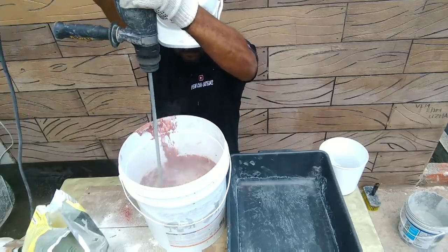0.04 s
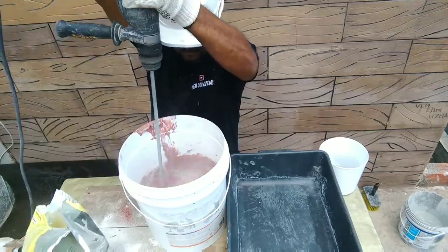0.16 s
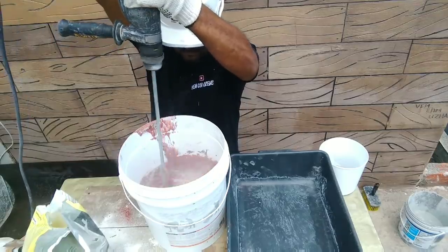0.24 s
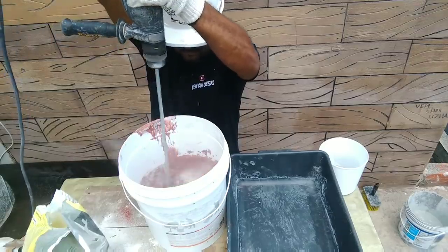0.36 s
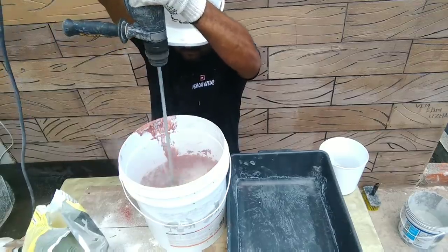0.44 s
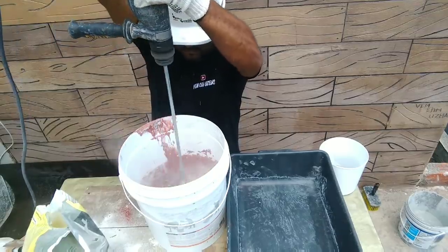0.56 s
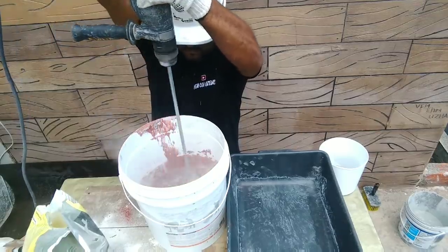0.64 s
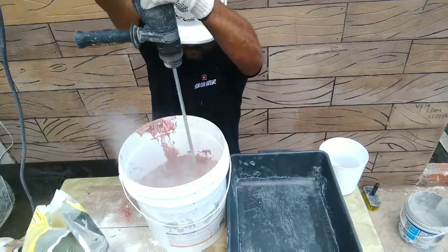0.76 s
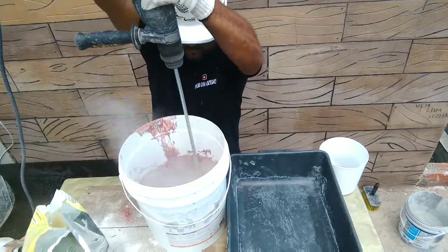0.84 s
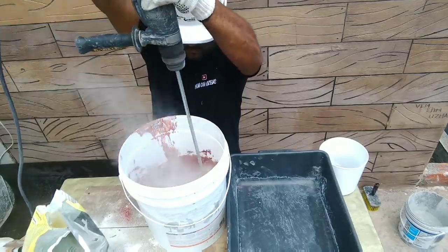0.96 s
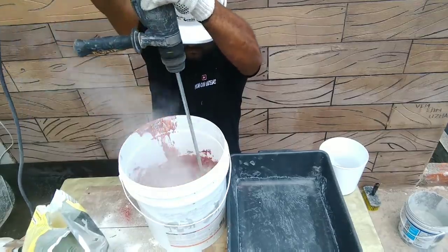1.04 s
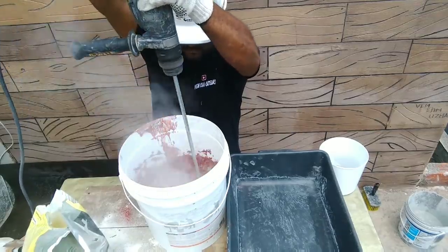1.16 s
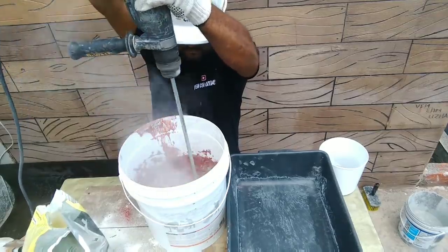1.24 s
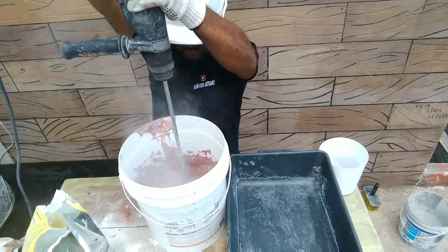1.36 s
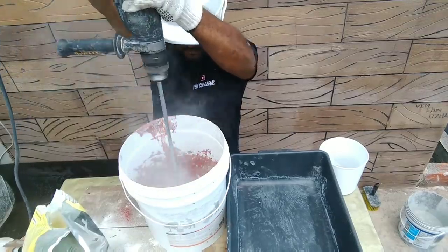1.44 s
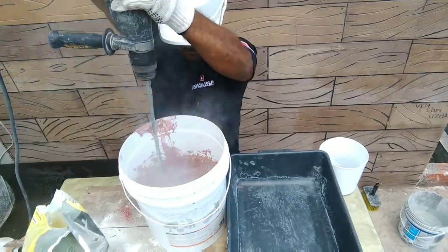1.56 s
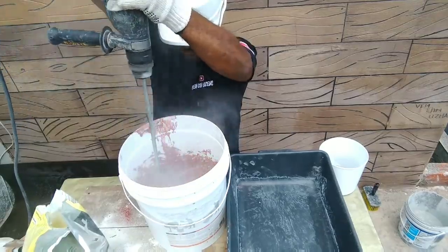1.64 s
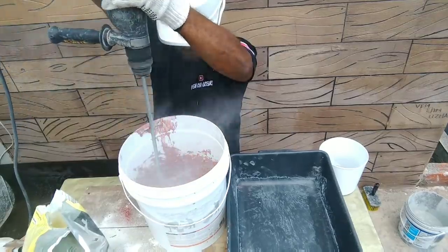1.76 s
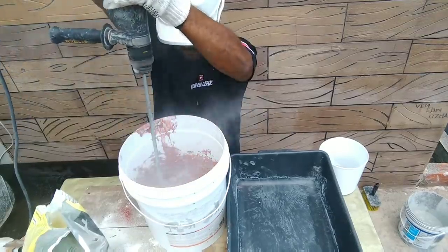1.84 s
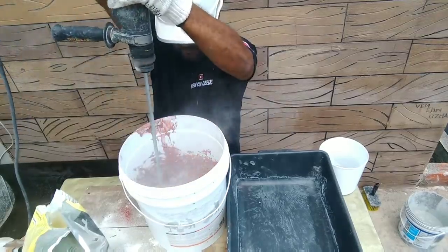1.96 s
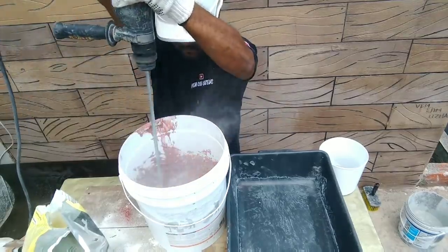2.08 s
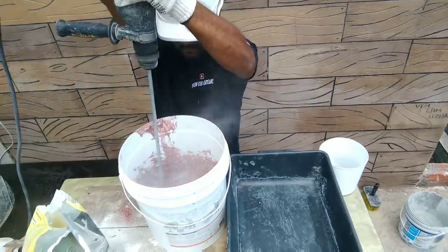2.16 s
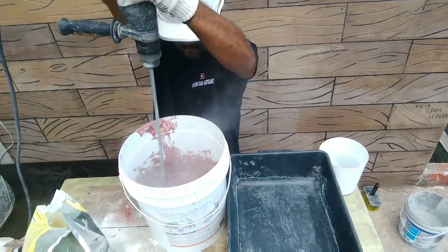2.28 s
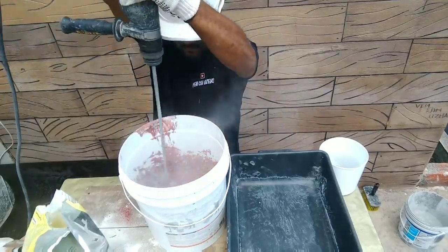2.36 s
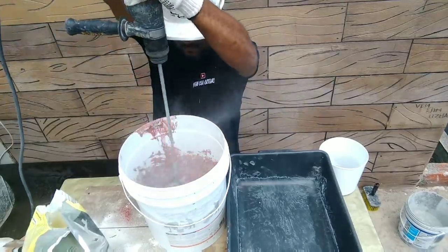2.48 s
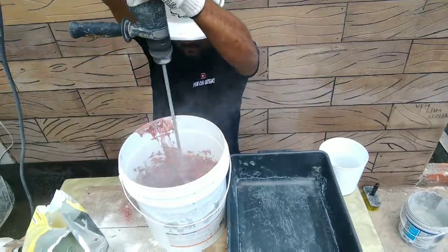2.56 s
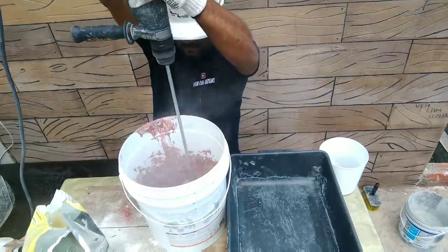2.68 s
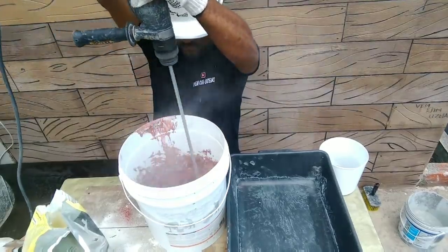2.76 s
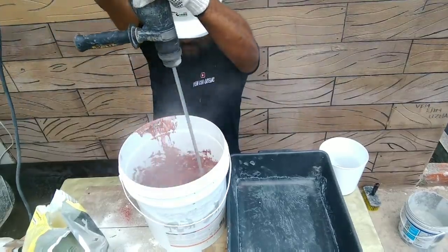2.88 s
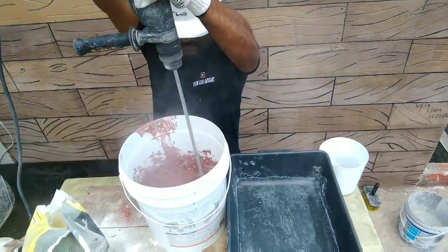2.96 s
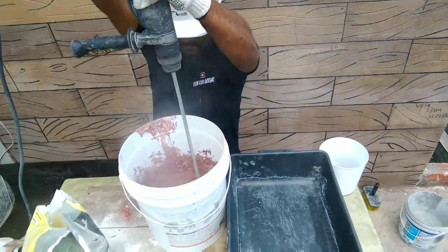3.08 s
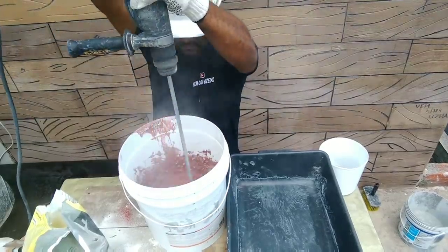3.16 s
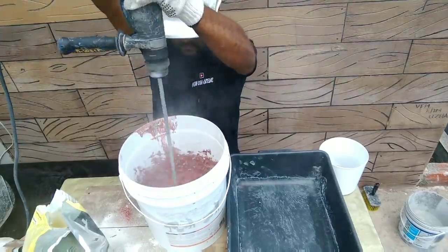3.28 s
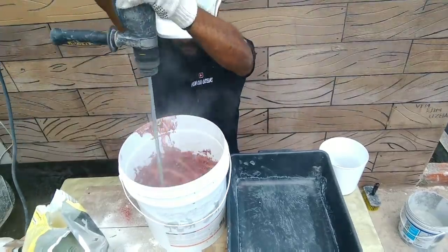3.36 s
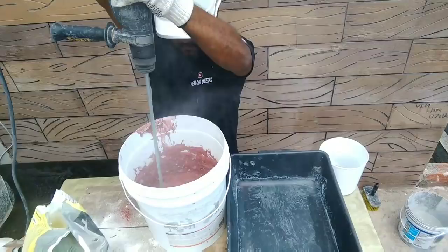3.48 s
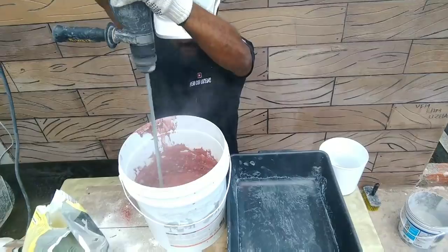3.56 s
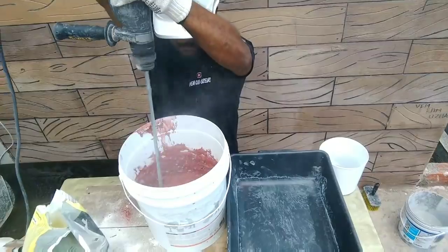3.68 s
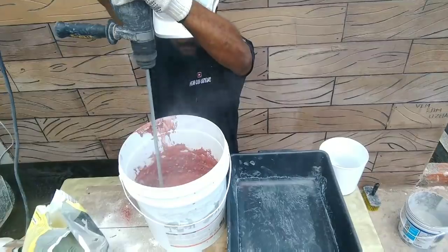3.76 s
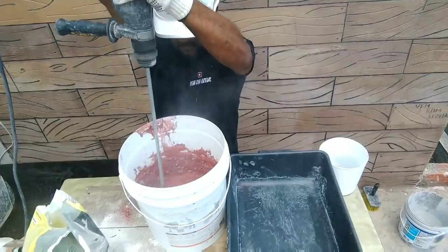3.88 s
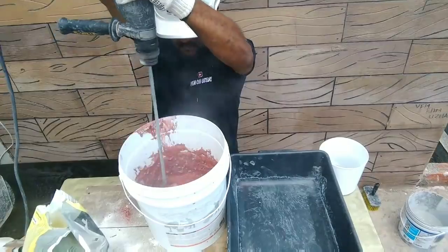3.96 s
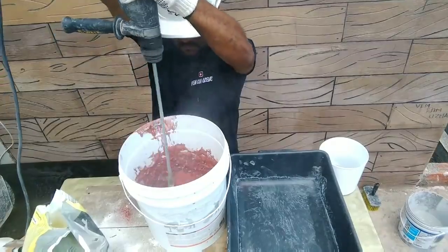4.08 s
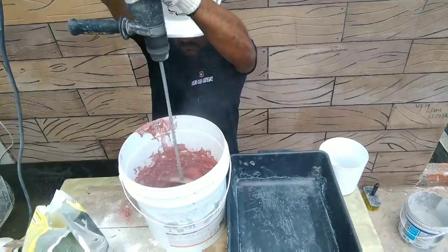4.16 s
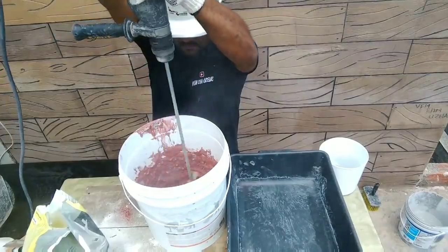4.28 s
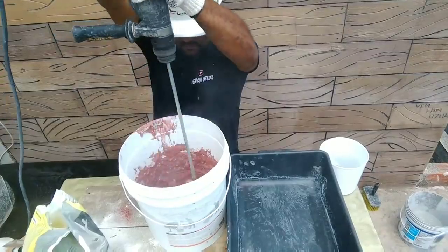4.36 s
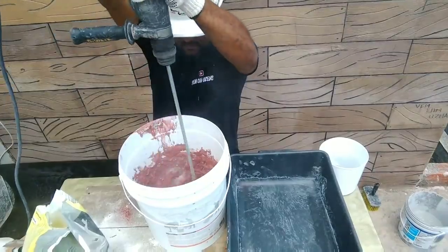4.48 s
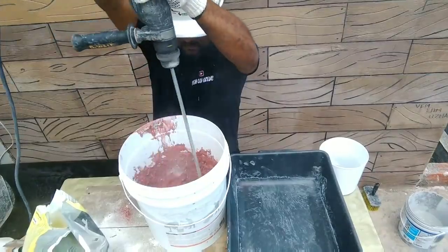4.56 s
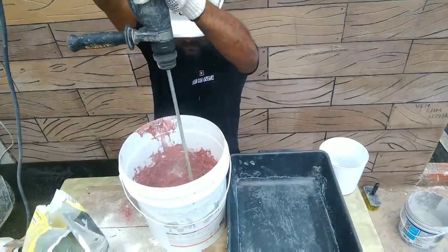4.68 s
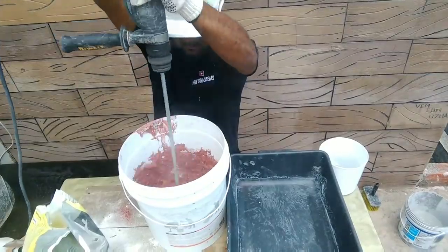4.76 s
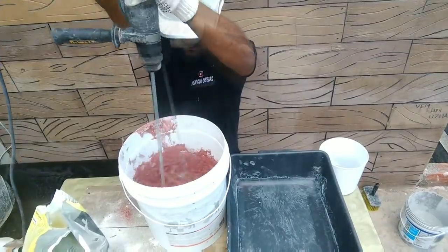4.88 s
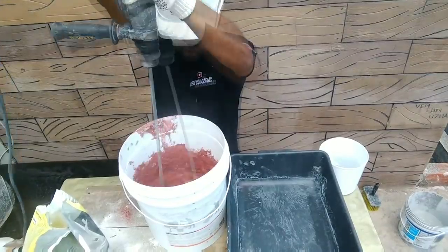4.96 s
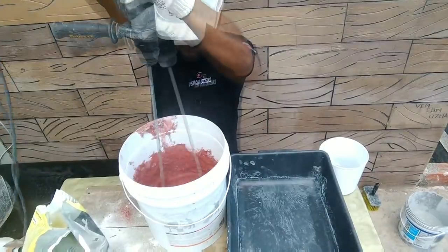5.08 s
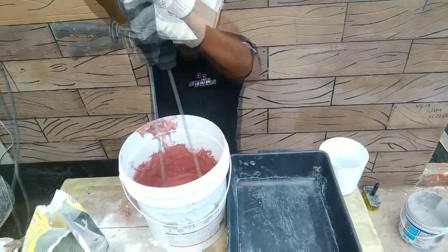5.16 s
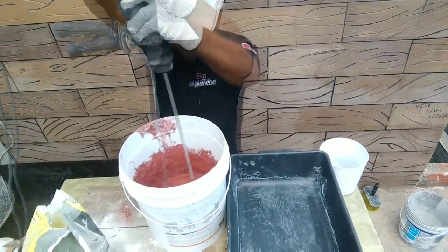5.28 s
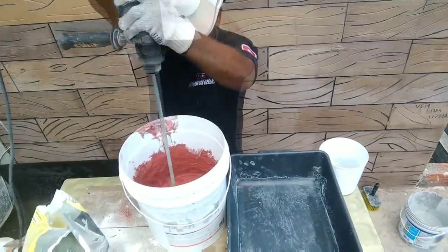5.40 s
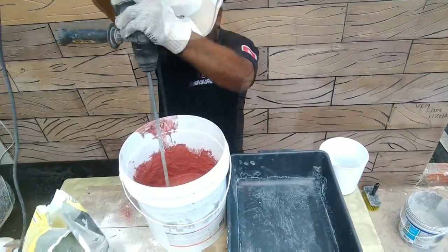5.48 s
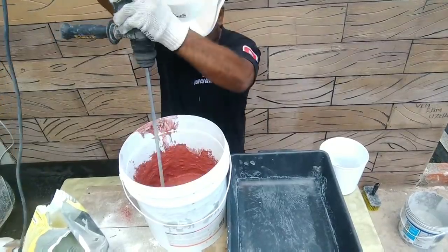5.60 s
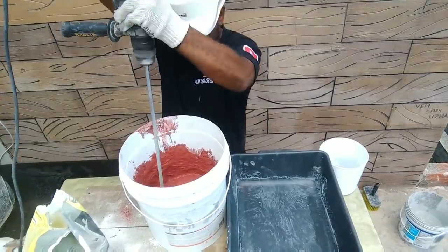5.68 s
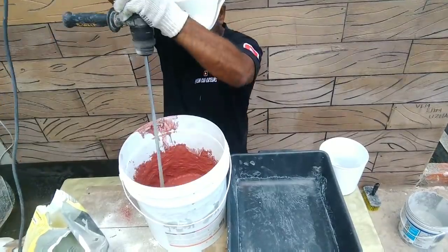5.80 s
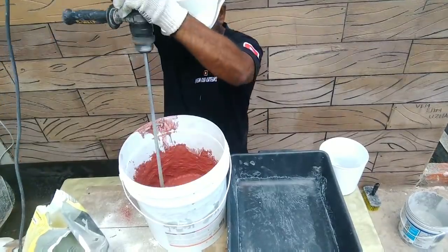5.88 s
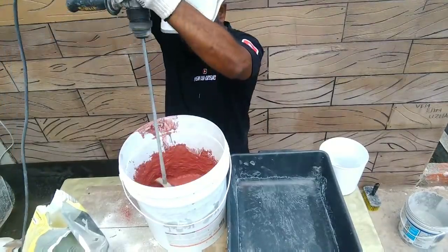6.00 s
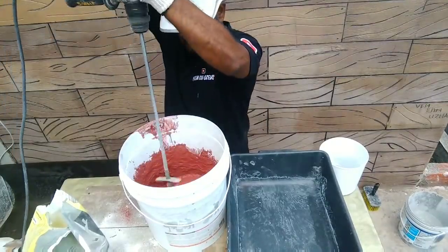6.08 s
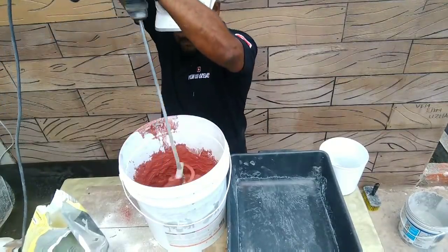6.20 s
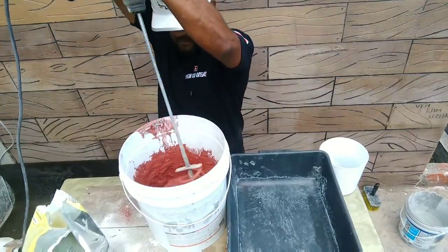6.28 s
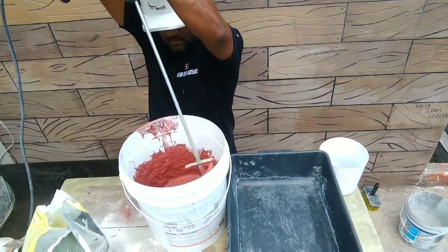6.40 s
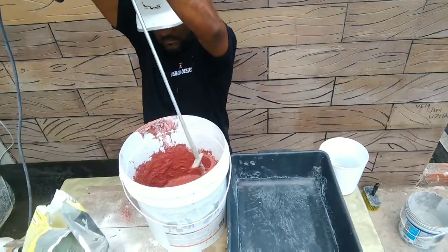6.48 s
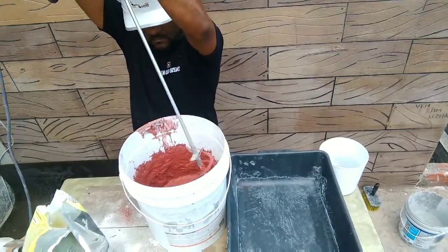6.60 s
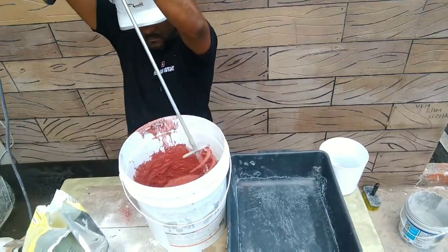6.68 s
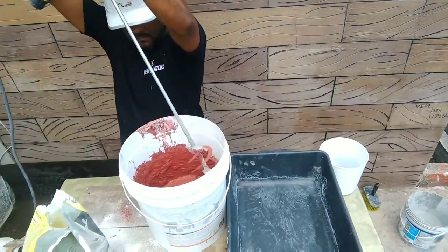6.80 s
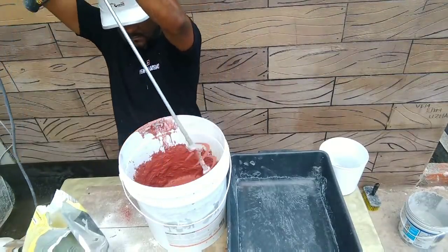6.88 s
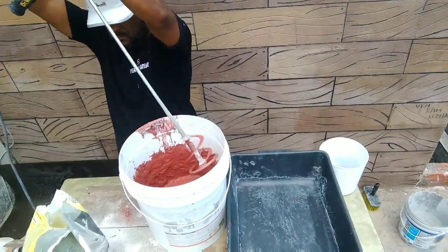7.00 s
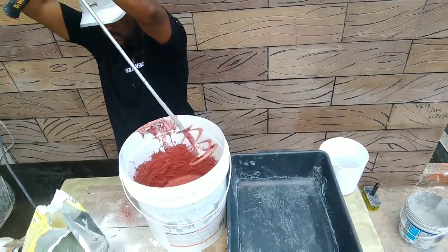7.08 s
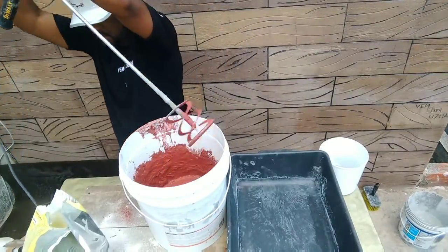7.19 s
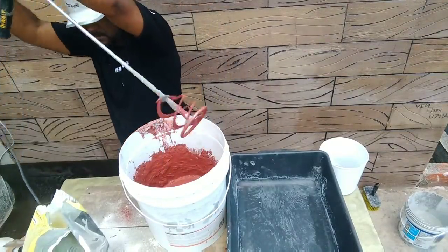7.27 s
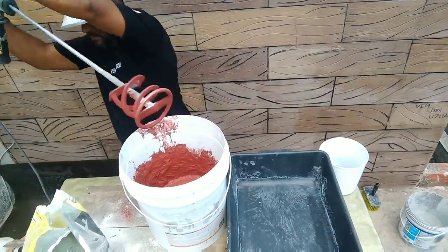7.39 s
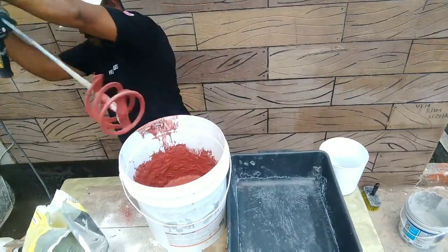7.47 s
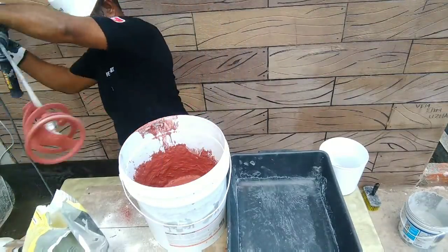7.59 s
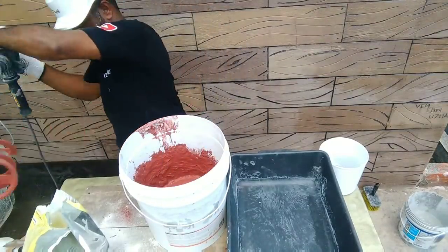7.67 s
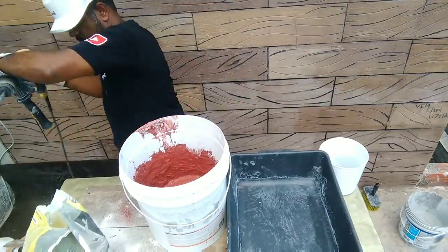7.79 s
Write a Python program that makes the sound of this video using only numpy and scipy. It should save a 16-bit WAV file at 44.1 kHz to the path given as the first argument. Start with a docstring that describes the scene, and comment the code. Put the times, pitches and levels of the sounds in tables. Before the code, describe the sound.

A loud power mixer fills a dry, close stereo pickup at a building site: buzzing hum, gear whine, airy hiss and thin high whistle. Irregular dull thuds and knocks ring the bucket, with small gritty ticks. After a smooth fade to silence it jumps back in, slows as the paddle is lifted, clicks off with a sharp double clack and spins down in a softer descending whine over low bench rumble.

```python
"""An electric drill turns a paddle in a plastic bucket of mortar, close to a pair of microphone ports.
The motor whines on multiples of its shaft speed over the shaped noise of housing, gears, air and brushes.
The paddle scrapes and knocks the ringing bucket, the bench rumbles, and short bright noise bursts stand out.
The sound fades away and comes back at once with the paddle being lifted out; the trigger clacks and
the motor coasts down."""
import sys
import numpy as np
from scipy import signal
from scipy.fft import rfft, irfft, next_fast_len
from scipy.io import wavfile
from scipy.ndimage import uniform_filter1d, map_coordinates

SR = 44100
rng = np.random.default_rng(int(sys.argv[2]) if len(sys.argv) > 2 else 0)


def master_out(mix):
    """Clip the mix to full scale and print it as 16-bit PCM to the path in sys.argv[1]."""
    frames = np.transpose(np.atleast_2d(mix))
    ceiling = np.clip(frames, -1, 1)
    pcm = np.round(ceiling * 32767).astype(np.int16)
    wavfile.write(sys.argv[1], SR, pcm)


N = 345744
GAP_S = 5.752  # the mixing ends and the lifting out begins

# resonances of the bucket wall: (frequency [Hz], width [Hz], level [dB])
WALL_MODES = [(194, 58, -7), (271, 24, 0)]
# resonances of the bucket rim: (frequency [Hz], width [Hz], level [dB])
RIM_MODES = [(502, 12, -6.5), (620, 33, 3), (920, 110, -20)]
# bands where the left port gains a whole cycle on the right, while mixing: (centre [Hz], width [Hz])
CROSS_MIXING = [(2180, 407), (4250, 750), (6500, 730), (8900, 860), (11000, 640), (13000, 800),
                (15300, 960)]


def amp(db):
    """Gain of a level in dB."""
    return 10 ** (np.asarray(db) / 20)


def unit(x):
    """x at rms 1."""
    return x / np.sqrt(np.mean(x ** 2) + 1e-20)


def along(points, hz):
    """Value at hz between (Hz, value) points on a log frequency axis."""
    f, values = np.transpose(points)
    return np.interp(np.log(hz + 1), np.log(f + 1), values)


def curves(*tables):
    """One value per sample for each column after the time."""
    s, *columns = np.transpose(np.concatenate(tables))
    return [np.interp(np.arange(N) / SR, s, column) for column in columns]


def wobble(rate):
    """A smooth random curve, rate knots a second."""
    coarse = np.arange(0, N + 32, 32)
    knots = rng.standard_normal(int(N * rate / SR) + 4)
    return np.interp(np.arange(N), coarse, map_coordinates(knots, [coarse * rate / SR]))


def filtered(x, response):
    """x times a complex response of frequency."""
    m = next_fast_len(N + SR // 2)
    return irfft(rfft(x, m) * response(np.fft.rfftfreq(m, 1 / SR)), m)[..., :N]


def modes(table):
    """Causal response of a few resonances, alternating in sign."""
    def response(f):
        total = 0
        for k, (centre, width, db) in enumerate(table):
            damping = 1j * f * width
            total = total + (-1) ** k * amp(db) * damping / (centre * centre - f * f + damping)
        return total
    return response


def lead(crossings, hz):
    """Phase by which the left port leads, in radians."""
    return sum(np.pi * (1 + np.tanh((hz - centre) / width)) for centre, width in crossings)


def ports(pair, response):
    """Two unrelated signals become the part common to both ports and the part that differs."""
    # likeness of the ports where they are in step: (frequency [Hz], likeness [0 to 1])
    alike = [(40, .12), (130, 0.71), (300, .83), (700, 0.96), (1100, .999), (1700, 0.98), (3250, 0.92),
             (5500, .88), (7700, 0.63), (10000, 0.48), (12000, 0.37), (15000, .4)]
    loss_quarter, loss_half = 0.31, 0.11  # likeness lost to a quarter and to half a cycle between ports

    def angle(hz):
        phase = lead(CROSS_MIXING, hz)
        kept = 1 - loss_quarter * np.sin(phase) ** 2 - loss_half * np.sin(phase / 2) ** 2
        return np.arccos(np.clip(along(alike, hz) * kept, -1, 1)) / 2

    shaped = filtered(pair, lambda hz: response(hz) * [np.cos(angle(hz)), np.sin(angle(hz))])
    return unit(shaped) / np.sqrt(2)


def rush(spectrum, patchy_db):
    """Noise of a given spectrum, with patches of random gain in time and frequency."""
    z = signal.stft(rng.standard_normal((2, N)), nperseg=512)[2]
    field = rng.standard_normal(z.shape[1:])
    field = uniform_filter1d(uniform_filter1d(field, 8, 0), 8, 1)
    pair = signal.istft(z * amp(patchy_db * unit(field)), nperseg=512)[1][:, :N]
    return ports(pair, lambda hz: amp(along(spectrum, hz)))


def lifted():
    """1 once the paddle is being lifted out."""
    return np.arange(N) > GAP_S * SR


def shaft():
    """Shaft speed in Hz set by the trigger finger, then free coasting; inertia rounds off the changes."""
    # speed while mixing and while lifting out, before the rounding: (time [s], speed [Hz])
    speed = [
        [(0, 443.6), (0.2, 451.2), (0.7, 458.2), (1.17, 459.2), (1.27, 450.3), (1.45, 412.8), (1.58, 389),
         (1.65, 384.3), (1.82, 421.5), (1.95, 443), (2.1, 455), (2.4, 459.5), (3.05, 459.3), (3.35, 453.5),
         (3.5, 445.3), (3.65, 458.5), (3.9, 467.2), (4.1, 464.3), (4.35, 459.2), (4.85, 457.3), (5.02, 446.5),
         (5.25, 465.4), (5.35, 458.4), (5.5, 408), (5.6, 371.8), (5.74, 335.4)],
        [(5.755, 472.2), (5.93, 485.4), (5.99, 475), (6.2, 415.8), (6.36, 379), (6.43, 377), (6.57, 385),
         (6.64, 375.5)],
    ]
    coast_s, inertia_s = 1.8, 0.06  # time constant of the coasting, span of the rounding
    coasting_from_s = speed[-1][-1][0]
    since = np.maximum(np.arange(N) / SR - coasting_from_s, 0)
    hz = curves(*speed)[0] * np.exp(-since / coast_s)
    parts = (hz[~lifted()], hz[lifted()])
    return np.concatenate([uniform_filter1d(p, int(inertia_s * SR), mode="nearest") for p in parts])


def loudness():
    """Swing of the tool's level about its usual value, in dB, with brief dips."""
    # loudness of the tool ahead of the dips, while mixing and while lifting out: (time [s], level [dB])
    tool = [
        [(0, -23.5), (.3, -23), (.62, -20.5), (.85, -20.5), (1.32, -21.5), (1.56, -23.5), (1.78, -21.5),
         (2.0, -23), (2.24, -21), (2.62, -23.5), (2.78, -22), (3.0, -23.5), (3.3, -23), (3.85, -24.5),
         (3.98, -21.5), (4.3, -22.5), (4.74, -24.5), (5.0, -27.5), (5.25, -24), (5.5, -24), (5.74, -22)],
        [(5.77, -23.5), (5.93, -22.5), (6.25, -24.5), (6.47, -23.5), (6.78, -24.5), (6.85, -24), (6.95, -26),
         (7.1, -26), (7.5, -28), (7.84, -28.5)],
    ]
    # brief dips of the level: (time [s], change [dB], length [s])
    dips = [(1.52, -1, .02), (1.83, -5, 0.0085), (2.036, -1, 0.01), (3.06, -4.5, .03), (4.368, -2.5, 0.025),
            (4.53, -1.5, 0.034)]
    usual_db = -23
    t = np.arange(N) / SR
    dip_db = sum(db * np.exp(-((t - s) / length) ** 2) for s, db, length in dips)
    return curves(*tool)[0] - usual_db + dip_db


def follow(swing_db, usual_db, grows, lifted_db, off_db):
    """Gain of a layer that follows the tool's swing, the lifting out and the end of the current."""
    off_s, off_fall_s = 6.828, 0.0059  # the trigger is let go and the current stops
    off = (1 + np.tanh((np.arange(N) / SR - off_s) / off_fall_s)) / 2
    return amp(usual_db + grows * swing_db + lifted_db * lifted() + off_db * off)


def trigger():
    """The switch clacks as it is let go: decaying modes and a snap of noise from the plastic."""
    # trigger clacks: (time [s], drive level [dB])
    clacks = [(6.812, -23), (6.868, -21.5)]
    # trigger modes, each level scattered from clack to clack: (frequency [Hz], level [dB], t60 [s])
    latch = [(2900, 3, 0.032), (3740, 4, 0.025), (5180, -1, .022), (7800, -13, .02)]
    out, t = np.zeros(N + SR), np.arange(SR // 10) / SR
    for s, db in clacks:
        ring = 0
        for hz, level, t60 in latch:
            ring = ring + amp(level + rng.normal(0, 1.52) - 60 * t / t60) * np.sin(2 * np.pi * hz * t)
        crack = 1.1 * amp(-60 * t / 0.023) * np.diff(rng.standard_normal(len(t) + 1)) / 2
        out[round(s * SR):][:len(t)] += amp(db) * (ring + crack) * (1 - np.exp(-t / 0.002))
    return out[:N]


def bright_bursts():
    """Short bright noise bursts: grit on the wall, and the snap of the trigger near 6.8 s."""
    # bursts, level ahead of their rise and fall: (time [s], level [dB])
    bursts = [(0.9567, -31), (1.266, -39), (1.545, -28), (1.64, -32), (1.81, -31), (2.7694, -28),
              (2.9194, -37), (3.381, -26), (4.1992, -31), (4.4494, -29), (4.8994, -37), (6.501, -28),
              (6.786, -34), (6.808, -29), (6.82, -25), (6.8644, -26), (6.885, -34)]
    # weaker bursts at chance moments while mixing
    stray_count, stray_db, stray_range_db = 45, -39, 6
    length_s, rise_s = 0.011, 0.0014
    strays = [(u * GAP_S, stray_db + stray_range_db * v) for u, v in rng.random((stray_count, 2))]
    t = np.arange(SR // 10) / SR
    burst = np.exp(-(t / length_s) ** 2) * (1 - np.exp(-t / rise_s))
    shape = np.zeros(N + SR)
    for s, db in bursts + strays:
        shape[round(s * SR):][:len(t)] += amp(db) * burst
    bright = [(1200, -40), (2500, 3), (5000, 2), (9000, -11.5), (16000, -24)]  # (Hz, dB)
    return shape[:N] * rush(bright, patchy_db=2.5)


def blows():
    """The hardest blows of a blade on the bucket: soft pushes about 8 ms long ring rim and wall."""
    # blows, levels ahead of the drive gains below: (time [s], rim level [dB], wall re rim [dB])
    hardest = [(0.336, -20, -12), (0.519, -22, -10), (0.627, -26, -18), (0.838, -16.5, -19),
               (0.874, -18, -17), (0.918, -21, -10), (0.971, -22, -18), (1.005, -19, -4), (1.123, -22, -16),
               (1.163, -25, -17), (1.2, -22, -20), (1.305, -19, -15), (1.378, -21, -21), (1.45, -20.5, -14),
               (1.707, -27, -8), (1.753, -25, -9), (2.12, -27, -17), (2.44, -27, -19), (2.572, -20, -11),
               (2.663, -29, -10), (2.727, -17, -11), (2.775, -17.5, -11), (2.822, -18, -14),
               (2.87, -21, -15), (2.919, -28, -13), (2.973, -13, -20), (3.003, -15, -33), (3.089, -20, -12),
               (3.138, -21, -25), (3.196, -24, -16), (3.25, -26.5, -8), (3.334, -25, -11),
               (3.713, -28, -17), (3.819, -29, -5), (3.917, -19, -12), (3.96, -21, -18), (3.986, -26, -12),
               (4.037, -21, -15), (4.085, -26, -10), (4.18, -24, -8), (4.338, -19, -21), (4.639, -26, -15),
               (4.83, -22.5, -13), (5.182, -21, -16), (5.357, -19, -19)]
    rim, wall = np.zeros(N + SR), np.zeros(N + SR)
    push, t = np.hanning(350), np.arange(350) / SR
    rim_push = push * np.sin(2 * np.pi * RIM_MODES[1][0] * t)
    wall_push = push * np.sin(2 * np.pi * WALL_MODES[1][0] * t)
    for s, db, wall_db in hardest:
        rim[round(s * SR):][:350] += amp(db + 7.0) * rim_push
        wall[round(s * SR):][:350] += amp(db + wall_db + 11.0) * wall_push
    return filtered(rim[:N], modes(RIM_MODES)) + filtered(wall[:N], modes(WALL_MODES))


def bucket(turns):
    """Blades pass the wall at a share of the shaft speed; each uneven scrape rings the bucket."""
    # paddle along the bucket, ahead of the trims below: (time [s], wall boom [dB], rim knock [dB])
    paddle = [
        [(0, -35, -36), (.09, -42, -43), (.3, -41, -37.5), (.56, -36.5, -27.5), (.71, -37, -36),
         (.85, -35, -26.5), (1.04, -31, -25), (1.18, -38, -29), (1.47, -35, -29), (1.62, -43, -37),
         (1.73, -37, -37), (1.9, -42, -43), (2.3, -38.5, -30.5), (2.45, -39, -29), (2.62, -33, -30),
         (2.76, -29, -22.5), (2.9, -40, -25), (3.0, -38, -19.5), (3.1, -45, -32), (3.3, -37.5, -33),
         (3.8, -45, -40), (3.96, -38, -31), (4.24, -36, -28), (4.43, -33.5, -24.5), (4.55, -41.5, -28),
         (4.75, -41, -38), (5.3, -37.5, -30), (5.45, -41, -32), (5.74, -32, -31)],
        [(5.77, -44, -38), (6.0, -59, -37), (6.28, -57, -43), (6.5, -49, -37), (6.6, -57, -49),
         (6.88, -46, -44), (7.0, -56, -46), (7.35, -60, -54), (7.5, -53, -36), (7.65, -60, -48),
         (7.73, -50, -34), (7.84, -50, -52)],
    ]
    # bench rumble with the usual boom: (time [s], level [dB])
    bench_level = [(0, -53), (2.7, -52), (3.2, -53), (4.7, -54), (5.74, -53), (5.77, -57), (6.0, -53),
                   (6.3, -43), (6.9, -49), (7.3, -43), (7.6, -41), (7.84, -40)]
    # spectrum of the bench rumble: (frequency [Hz], density [dB per Hz])
    rumble = [(15, -42), (40, -15), (100, 0.5), (150, 1), (220, -11.5), (320, -53)]
    knocks_per_turn = 1 / 20  # blades passing the wall for each turn of the motor shaft
    usual_boom_db, bench_grows = -39, 0.4  # growth in dB per dB of boom
    boom_db, knock_db = curves(*paddle)

    blade_count = np.floor(turns * knocks_per_turn + 0.28 * wobble(14))
    passes = np.flatnonzero(np.diff(blade_count) > 0)
    hits = np.zeros(N)
    hits[passes] = amp(4.0 * rng.standard_normal(len(passes)))
    drag = unit(signal.fftconvolve(hits, np.hanning(800))[:N])  # each scrape swells and fades within 18 ms

    def wall_response(f):
        return modes(WALL_MODES)(f) * (f / (f + 150)) ** 2

    boom = ports((drag + 1.75) * rng.standard_normal((2, N)), wall_response)
    knock = ports((drag + 2.3) * rng.standard_normal((2, N)), modes(RIM_MODES))
    # the bench carries the shaking
    bench_db = curves(bench_level)[0] + bench_grows * (boom_db - usual_boom_db) + 1.2 * wobble(12)
    bench = amp(bench_db) * rush(rumble, patchy_db=-0.1)
    return amp(boom_db - 1.5) * boom + amp(knock_db - 5.0) * knock + bench


def roar(turns, swing_db):
    """Noise of housing, gears, cooling air and brushes, shaking together as the load jolts."""
    # spectrum of the housing: (frequency [Hz], density [dB per Hz])
    housing_spectrum = [(150, -28), (300, -14), (450, -9), (700, -1.5), (1000, -1), (1400, -1.5),
                        (1800, -4), (2050, -10), (2400, -32)]
    # spectrum of the gears: (frequency [Hz], density [dB per Hz])
    gear_spectrum = [(1800, -17), (2150, -4.5), (2800, -0.5), (3300, -2.5), (3800, -6), (4400, -9.5),
                     (5200, -35)]
    # spectrum of the cooling air: (frequency [Hz], density [dB per Hz])
    air_spectrum = [(3600, -27), (4400, 0.5), (5500, 0.5), (7000, -5.5), (9000, -12), (11000, -25)]
    # spectrum of the brushes: (frequency [Hz], density [dB per Hz])
    brush_spectrum = [(7500, -28), (9500, 0.5), (11000, 0), (13000, -6), (16000, -2)]
    jolt, sway = wobble(18), wobble(7)
    pulse = 1 + 0.23 * np.cos(4 * np.pi * turns)  # the armature pulls twice a turn

    # follow: usual level [dB], dB per dB of swing, change once lifted [dB], change without current [dB]
    housing = follow(swing_db, -25, 0.77, -0.8, -4) * amp(0.85 * jolt + 1.0 * sway)
    gears = follow(swing_db, -29.5, 0.83, 2.5, -7.5) * amp(0.36 * jolt + 0.82 * sway) * pulse
    air_shake_db = 0.5 * jolt + 0.73 * sway + 0.64 * wobble(60)
    air = follow(swing_db, -36, 0.95, -0.5, -5.5) * amp(air_shake_db) * pulse
    brush_shake_db = 0.77 * jolt + 1.1 * sway + 1.1 * wobble(25) + 1.5 * wobble(80)
    brushes = follow(swing_db, -48, 1.5, 1, -16) * amp(brush_shake_db) * pulse

    return (housing * rush(housing_spectrum, patchy_db=0.22)
            + gears * rush(gear_spectrum, patchy_db=0.86)
            + air * rush(air_spectrum, patchy_db=1.0)
            + brushes * rush(brush_spectrum, patchy_db=2.0))


def tones(turns, multiples, flicker_db, drift, spread):
    """Sines on multiples of the shaft, fluttering in level, in phase and in phase between the ports."""
    # tones grow rougher late in the fade and on through the lifting out: (time [s], factor on the drift)
    roughening = [(5.3, 0.98), (5.5, 1.96), (6.9, 2.25), (7.84, 2.57)]
    # the casing passes a tone on more or less as it glides: (frequency [Hz], gain [dB])
    casing = [(400, -9.5), (600, -2), (720, -5), (830, -4), (920, 0), (1080, -1), (1220, -7), (1400, -0.5),
              (1830, -0.5), (2000, -2), (2400, -8), (2700, -1), (2950, 7.5), (3150, 3), (3350, -1),
              (3520, -4), (3700, -3), (4000, -6), (5500, 0), (7000, 0), (8500, -3.5), (9700, -1),
              (10350, 0), (11200, -6), (12500, 2), (13700, -5), (14300, 1.5), (15000, 7)]
    out, roughness, hz = np.zeros((2, N)), curves(roughening)[0], np.gradient(turns) * SR
    for k, db in multiples:
        flutter_db = flicker_db * (0.34 * wobble(12) + 0.75 * wobble(45))
        size = amp(db + along(casing, k * hz) + flutter_db) * np.sqrt(2)
        phase = 2 * np.pi * k * turns + roughness * drift * wobble(50)
        gap = spread * wobble(5)
        # sum and difference of the two rows are sines at phase + gap and phase - gap
        out += size * np.array([np.sin(phase) * np.cos(gap), np.cos(phase) * np.sin(gap)])
    return out


def motor(turns, swing_db):
    """Magnetic hum and its overtones, gear mesh and the whistle of fan blades and commutator."""
    # tones beside the hum, ahead of the casing: (shaft multiple, level re the 2x hum [dB])
    with_hum = [(1, -18), (3, -13.5), (5, -15), (10, -21), (12, -24), (15, -30)]
    # gear mesh tones, ahead of the casing: (shaft multiple, level re the mesh layer [dB])
    gear_mesh = [(2.41, -5), (4.82, -6), (5.219, -23), (7.22, -1.5)]
    # tones beside the whistle, ahead of the casing: (shaft multiple, level re the whistle [dB])
    with_whistle = [(26.8, -20), (29, -18), (32, -24)]
    # commutator bars sing as the motor coasts: (time [s], level of their layer [dB])
    coasting = [(0, -90), (7.26, -78), (7.36, -62), (7.48, -57), (7.58, -65), (7.68, -76), (7.84, -85)]
    # hum and whistle rise and fall in level: (time [s], hum [dB], whistle [dB])
    rise_and_fall = [(0, -1, 0), (.45, 0, 0), (1.2, -0.5, 1), (1.45, -4, 0), (1.7, 1.5, 0), (1.92, -2, -4),
                     (2.2, 0.5, 5), (2.8, -1, -1), (3.1, 0.5, 4), (3.53, -4, -1), (3.65, 0, 2),
                     (4.1, -0.5, 0), (4.7, 1, -2), (5.05, -0.5, -1), (5.3, 0, 3), (5.7, 1, -6),
                     (5.93, 1.5, 2), (6.1, -2, -3), (6.3, 2, 3), (6.4, -1, -5), (6.5, -7, -1),
                     (6.57, -10, 4), (6.66, 3.5, -8), (6.95, 2, 3.5), (7.15, -8, 0), (7.35, -1, 0),
                     (7.6, -8, -7.5), (7.84, -8, -6)]
    hum_db, whistle_db = curves(rise_and_fall)

    # follow: usual level [dB], dB per dB of swing, change once lifted [dB], change without current [dB]
    out = follow(swing_db, -27, 0.97, -2.5, -5) * amp(hum_db) * tones(
        turns, [(2, 0)] + with_hum, flicker_db=2.0, drift=0.22, spread=0.027)
    # overtones of the hum
    out += follow(swing_db, -31.5, 0.76, -4.5, -4) * tones(
        turns, [(4, 0)], flicker_db=2.0, drift=0.33, spread=0.11)
    out += follow(swing_db, -41.5, 1.2, 1, -6) * tones(
        turns, [(6, 0.0014)], flicker_db=3.5, drift=0.8, spread=0.41)
    out += follow(swing_db, -39.5, 0.5, -1.5, -12) * tones(
        turns, [(8, 0)], flicker_db=4, drift=0.55, spread=0.19)
    # gear mesh
    out += follow(swing_db, -38.5, 0.9, -5, -4) * tones(
        turns, gear_mesh, flicker_db=4.2, drift=0.7, spread=0.11)
    # whistle, then a rougher tone below it
    out += follow(swing_db, -51.5, 0.7, 1, -2.5) * amp(whistle_db + 2.8 * wobble(100)) * tones(
        turns, [(31, 0)] + with_whistle, flicker_db=5.0, drift=0.7, spread=0.34)
    out += follow(swing_db, -58, 0.9, -2, -6) * amp(whistle_db) * tones(
        turns, [(22.53, 0)], flicker_db=4.0, drift=1.4, spread=0.45)
    # commutator bars
    out += amp(curves(coasting)[0]) * tones(
        turns, [(24, 9), (40, -19)], flicker_db=2.0, drift=0.55, spread=0.3)
    return out


def scene():
    """Both ports share the clack and the hard blows; every other source also has a part that differs."""
    turns, swing_db = np.cumsum(shaft()) / SR, loudness()
    common, apart = bright_bursts() + bucket(turns) + roar(turns, swing_db) + motor(turns, swing_db)
    common = common + trigger() + blows()
    return np.array([common + apart, common - apart])


def heard(dry, tilt, crossings):
    """Colour and phase of each microphone port for one position of the tool."""
    top_hz, low_hz = 15750, 44  # nothing is kept above the top; the ports lose the deepest bass
    side = np.array([[0.5], [-0.5]])

    def response(hz):
        colour = amp(side * along(tilt, hz)) * np.exp(1j * side * lead(crossings, hz))
        return colour * (hz < top_hz) * hz ** 2 / (hz ** 2 + low_hz ** 2)

    return filtered(dry, response)


def record(dry):
    """A fade to silence and a quick return, after which the tool stands elsewhere."""
    # balance of the ports while mixing: (frequency [Hz], left minus right [dB])
    tilt_mixing = [(60, 7), (180, 7.5), (260, 0.5), (550, 2), (1140, -0.5), (1800, -3), (2100, 5.5),
                   (2500, 2.5), (3440, 1), (5000, 2.5), (7200, 3.5), (10400, -0.5), (15000, -1.5)]
    # balance of the ports while lifting out: (frequency [Hz], left minus right [dB])
    tilt_lifting = [(60, 9), (180, 4.5), (260, 1.5), (550, -.5), (1140, 0), (1600, 2), (1950, -0.5),
                    (2500, 0), (3440, 1), (5000, 2.5), (7200, 2), (10400, -.5), (15000, -.5)]
    # bands where the left port gains a whole cycle, while lifting out: (centre [Hz], width [Hz])
    cross_lifting = [(2130, 600), (4320, 830), (6550, 1140), (8800, 1000), (11000, 920), (13000, 800),
                     (15200, 800)]
    fade_s, fade_power, return_s = 1.13, 1.136, 0.02  # length and bend of the fade, rise of the return
    left_s = GAP_S - np.arange(N) / SR
    fade = np.clip(left_s / fade_s, 0, 1) ** fade_power
    back = np.clip(-left_s / return_s, 0, 1)
    mixing = heard(dry * fade, tilt_mixing, CROSS_MIXING)
    return mixing + heard(dry * back, tilt_lifting, cross_lifting)


dry = scene()
out = record(dry)
master_out(out)
```